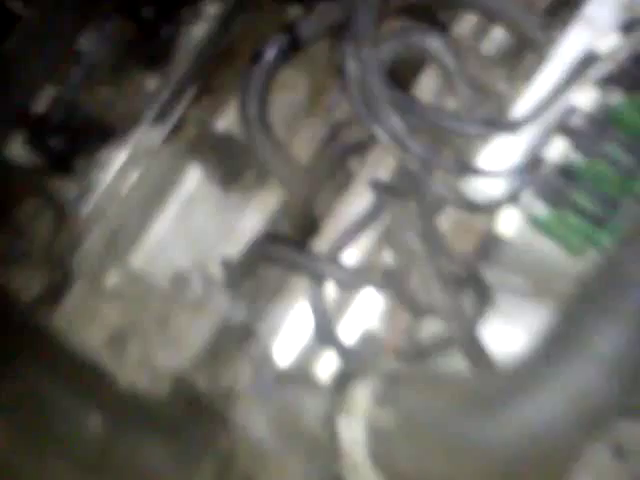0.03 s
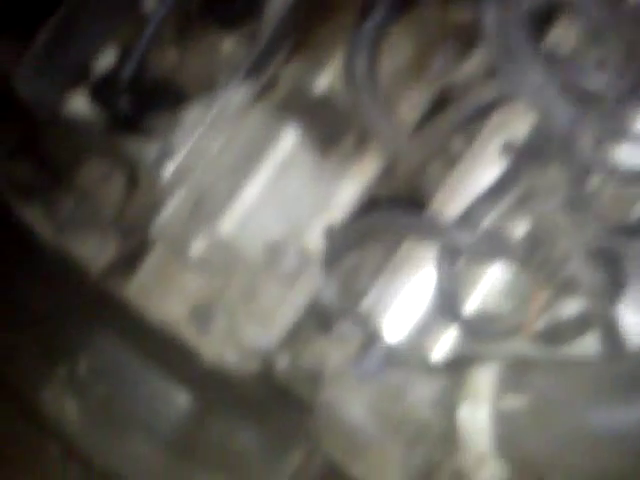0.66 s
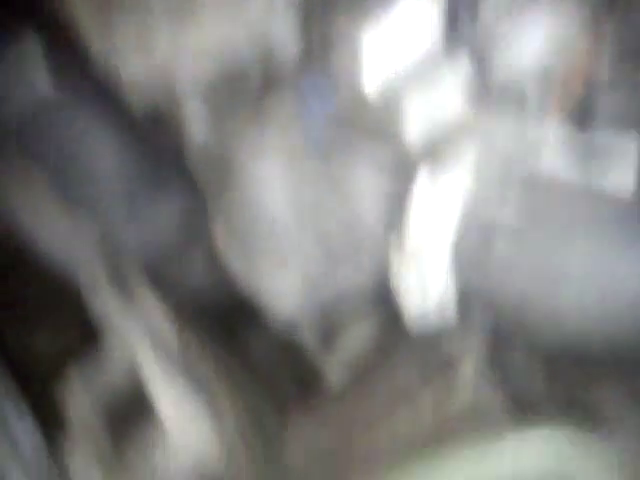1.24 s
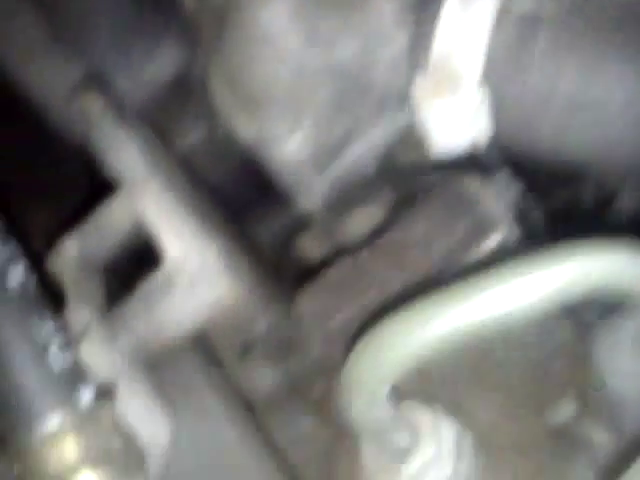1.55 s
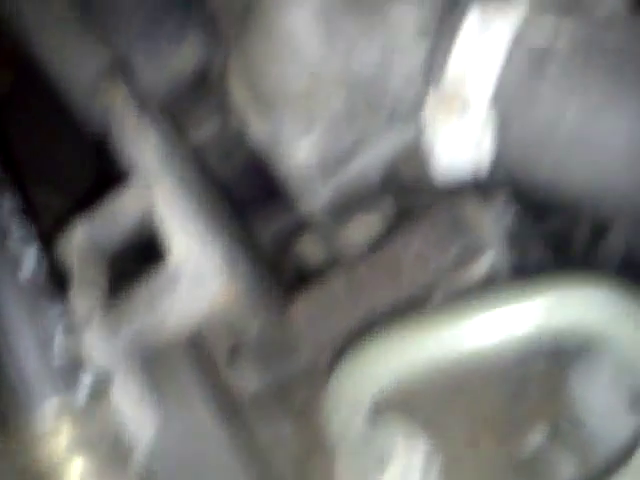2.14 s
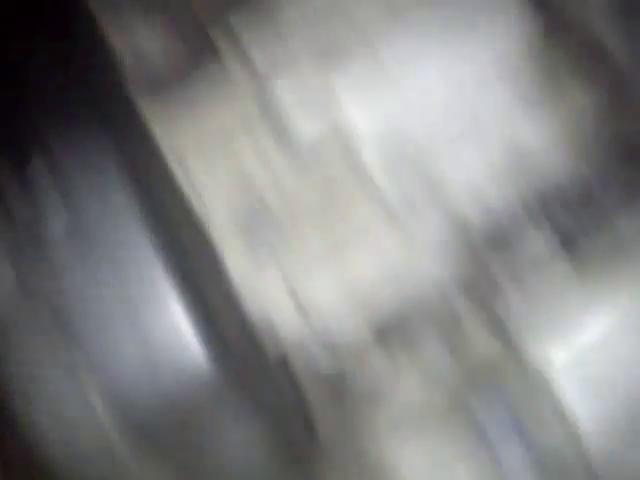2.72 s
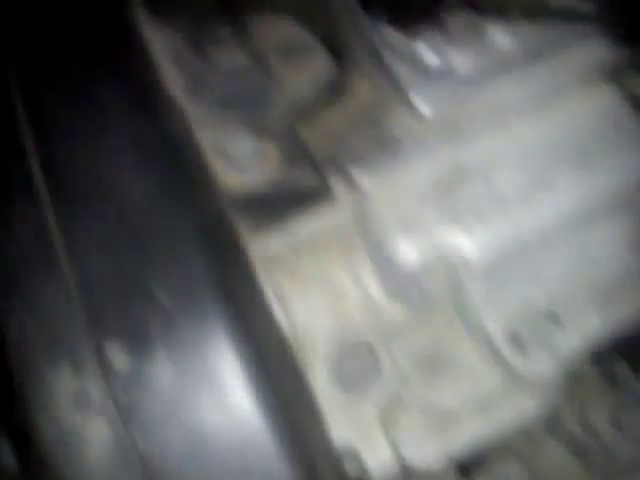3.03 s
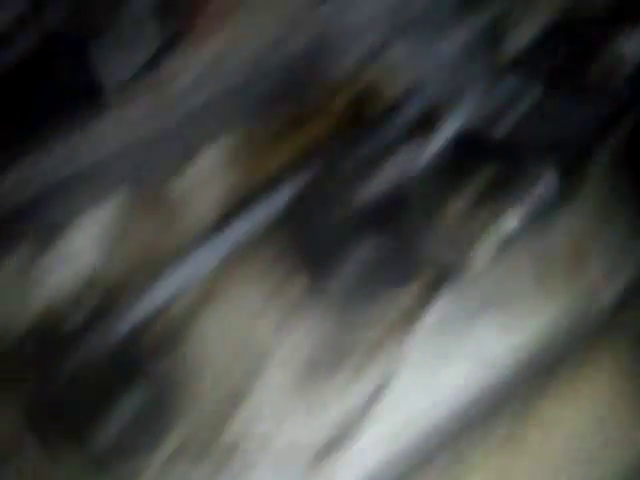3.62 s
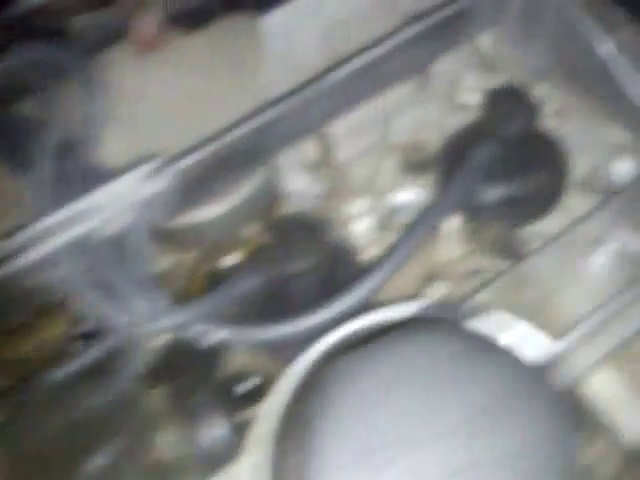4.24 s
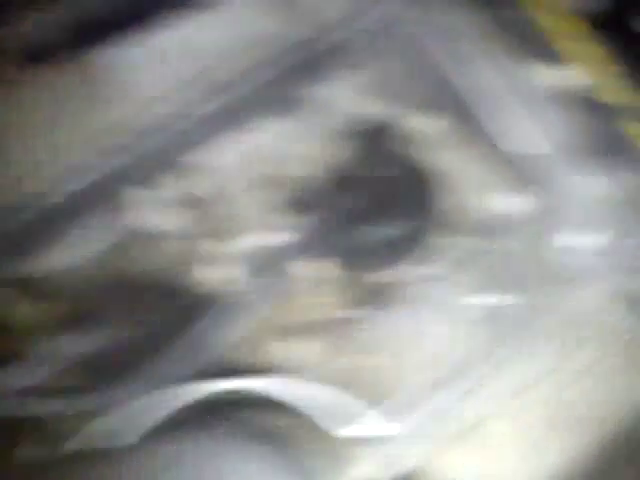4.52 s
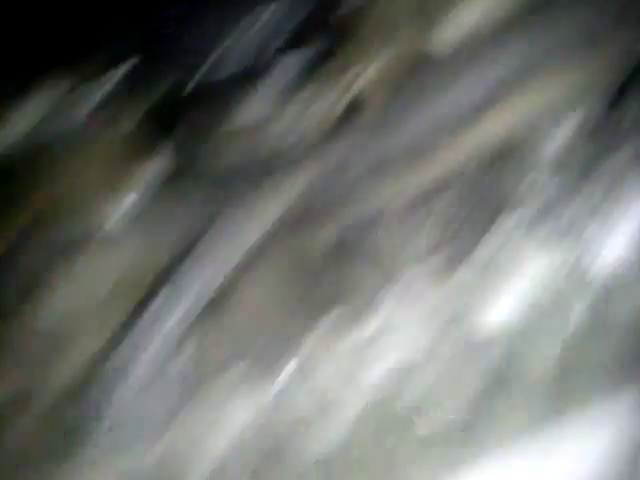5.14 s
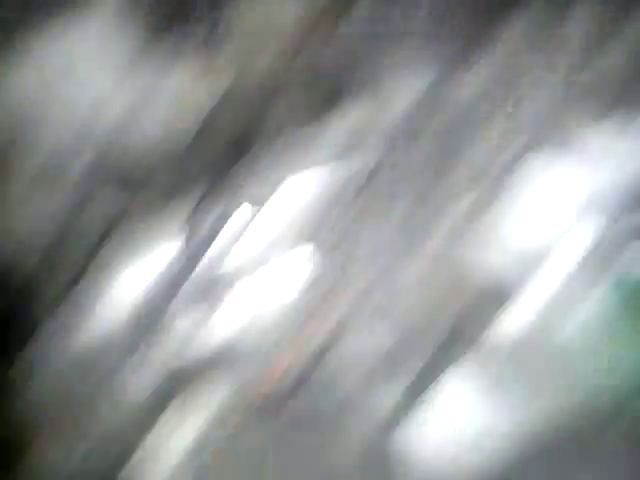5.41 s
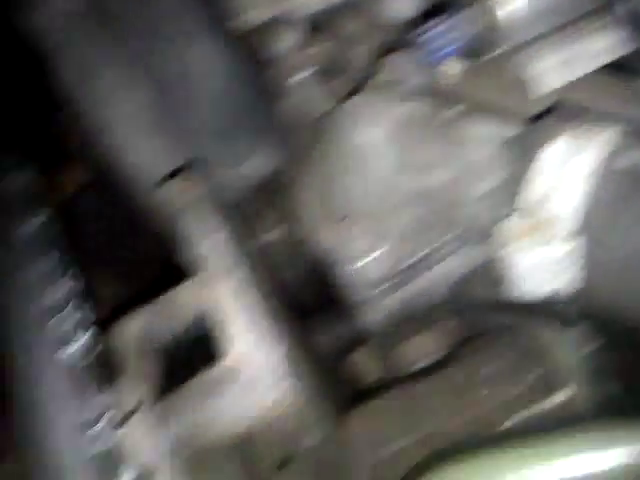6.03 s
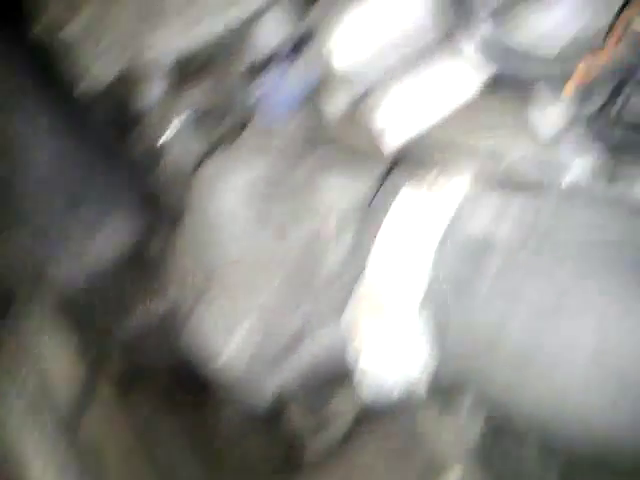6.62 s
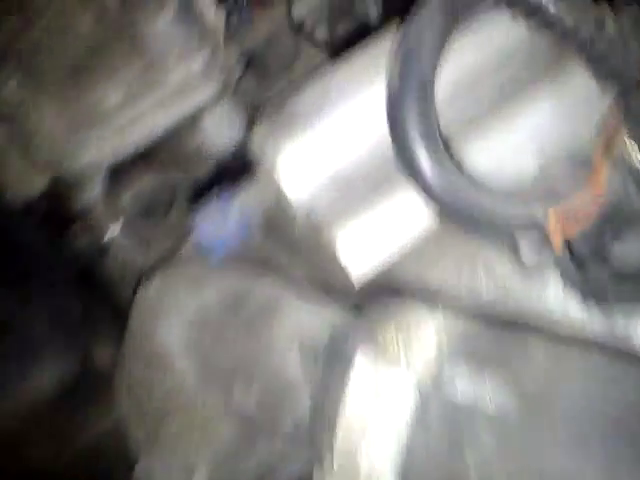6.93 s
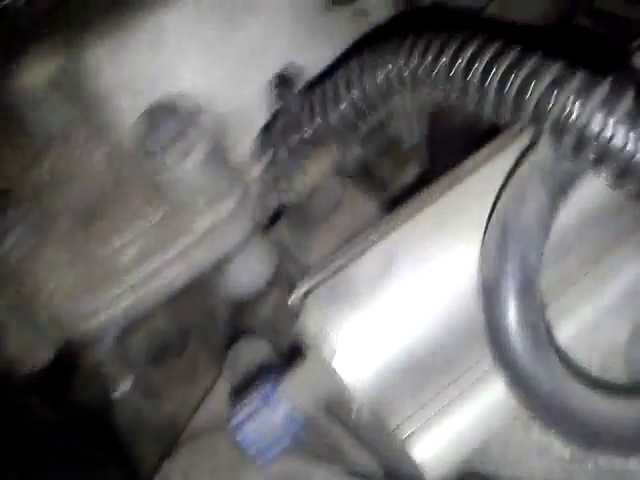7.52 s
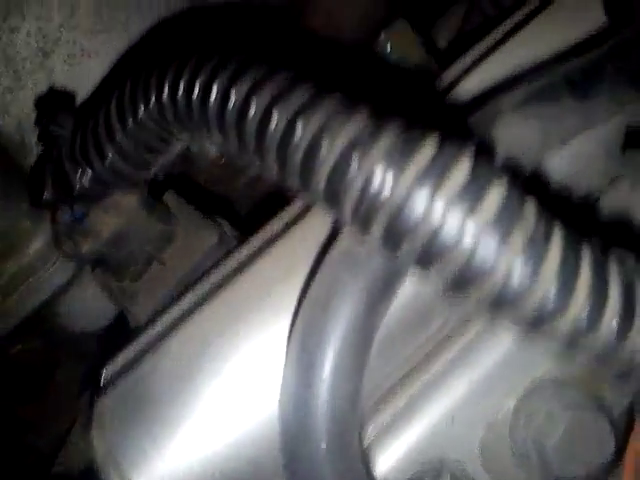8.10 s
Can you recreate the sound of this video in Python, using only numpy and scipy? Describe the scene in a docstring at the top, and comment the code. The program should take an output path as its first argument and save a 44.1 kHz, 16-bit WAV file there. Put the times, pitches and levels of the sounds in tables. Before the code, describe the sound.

Heard from inside the engine bay, an idling car engine clatters with fast metallic ticks and knocks above a low throb and whirr.

```python
"""After 0.8 s of silence a clattering four-cylinder petrol idle cuts in, about 775 rpm, close under the hood.
The belt drive's whirr and a low throb form the bed. On top, every engine cycle repeats the same hits: two
loose lifters clack, firings thud, the intake puffs, the timing gear shimmers, valves tick, one cylinder
knocks and pistons slap. The microphone passes over the valve cover midway, bringing up its hard ring;
just after 4 s one lifter takes up its slack and quietens."""
import sys
import numpy as np
from scipy import signal
from scipy.fft import rfft, irfft
from scipy.io import wavfile

SR = 44100
rng = np.random.default_rng(int(sys.argv[2]) if len(sys.argv) > 2 else 0)


def dump_mix(stems):
    """Bounce the given channels to the path in sys.argv[1] as a 16-bit WAV at rate SR."""
    frames = np.atleast_2d(stems).T  # one column per channel
    limited = np.clip(frames, -1, 1)  # hard clip at full scale
    pcm = np.round(limited * 32767).astype(np.int16)
    wavfile.write(sys.argv[1], SR, pcm)


N = 364266

# wandering idle: t/s, speed/rpm
IDLE_SPEED = [(0.78, 770.2), (1.05, 764.4), (1.92, 782.9), (2.4, 767.4), (2.65, 779.0), (3.18, 767.9),
              (4.68, 771.7), (4.83, 782.2), (5.2, 769.1), (5.57, 779.0), (6.37, 774.7), (8.26, 783.6)]
# how near the moving microphone is to the cylinder head: t/s, level/dB
NEARNESS = [(.9, -2.5), (1.8, -2.5), (3, 1), (3.8, 2.5), (4.9, -0.5), (5.5, 1), (5.9, -3), (6.8, -1.5),
            (7.6, 1.5), (8.2, 1.5)]
# EQ of the belt and fan noise: f/Hz, relative level/dB
WHIRR_EQ = [(40, -12), (70, -3), (110, 1.5), (230, -3.5), (450, 4), (700, -1), (1400, -1), (2300, -2),
            (3100, -5.5), (4000, -7), (5300, -12.5), (7000, -16), (10000, -19), (16000, -28)]
# fader ride of the alternator whine: t/s, level/dB
WHINE_RIDE = [(1, -46.5), (3.1, -44), (3.7, -39.5), (4.4, -41.5), (5.65, -55), (5.8, -38), (6.8, -40.5),
              (8.2, -42.5)]
# partials of the throb: f/cycle rate, relative level/dB
THROB_ORDERS = [(4, -9), (8, -19.5), (15, -10), (16, -2), (18, -8.5), (19, -10), (20, -16), (24, -17),
                (28, -15), (30, -18.5), (44, -15.5)]
# hit patterns: position/cycle, relative level/dB, t60 of the crack/s
FIRST_LIFTER_HITS = [(.107, 0, 0.026), (.133, 14, 0.017)]
SECOND_LIFTER_HITS = [(.825, 0.5, 0.017), (.842, -1.5, 0.032), (.886, -2.5, 0.009), (.936, -9.5, 0.023)]
KNOCK_HITS = [(.546, 0.5, 0.024), (.566, -2.5, 0.039), (.611, 2.5, 0.01), (.638, 0, .009), (.66, -8, 0.029)]
VALVE_HITS = [(0.356, 13, 0.028), (0.386, 8.5, 0.016), (0.606, 12, 0.018), (0.639, 12, 0.012),
              (.107, 10, 0.012), (.238, 2, 0.021)]
FIRING_HITS = [(.035, -1, .12), (.285, -1.5, 0.14), (.535, -1.1, 0.077), (.785, 0.39, 0.076)]
# tone of each struck part: f/Hz, relative level/dB
FIRST_LIFTER_EQ = [(780, -21), (1350, 0.5), (2000, -7), (2320, 3), (2550, -6), (2800, -1.5), (3600, 4.5),
                   (4400, -2), (5100, 2.5), (6600, -1), (8000, -6), (9200, -3.5), (11500, -12), (13000, -6),
                   (14400, -14), (16000, -14)]
SECOND_LIFTER_EQ = [(780, -6.5), (1300, -1), (2000, -5), (2800, -4.0), (3800, 1.8), (4600, -6.5),
                    (5300, -2), (6700, -4.5), (8000, -10), (9500, -7.5), (11500, -15.5), (13000, -10),
                    (14200, -16.4), (16000, -15.5)]
KNOCK_EQ = [(390, -14), (650, -23), (850, -10.5), (1050, 3), (1250, -6.5), (1550, 1.5), (2050, 2),
            (2600, 1.5), (3200, -1), (4200, -1.5), (5000, -14), (7000, -20), (12000, -43)]
VALVE_EQ = [(780, -9), (1300, -11), (2200, -4), (3500, 1), (5200, -6.5), (6700, -7), (8200, -4),
            (9300, -3.5), (11500, -8), (15500, -21)]
BLOCK_EQ = [(390, -25.5), (650, -9), (800, -2), (1000, -0.8), (1400, -4), (1700, -1.8), (2200, -9),
            (3000, -20.5), (5000, -23), (12000, -28)]
# ride of the valve cover's ring as the microphone passes over it: t/s, level/dB
COVER_RIDE = [(1, 3.5), (2.4, 0.5), (3.2, 5), (3.8, 8.5), (4.5, 10.5), (5.4, 2), (6.7, 3.5), (7.7, -1.5)]
# intake gulps, timing gear rubs and piston slaps: position/cycle, relative level/dB
INTAKE_GULPS = [(.168, 2), (.42, 4), (.668, 2), (.9, 0)]
GEAR_RUBS = [(.235, 5), (.745, 4)]
PISTON_SLAPS = [(.548, 2), (0.846, -2.5)]
# hollow ring of the cylinder wall: f/Hz, width/Hz, relative level/dB
WALL_MODES = [(1509, 39, -1.5), (1794, 120, -1.5), (2102, 46, 3), (2270, 79, -22)]
# resonances of head, covers and brackets: f/Hz, width/Hz, relative level/dB
BODY_MODES = [(862, 15.4, -3.5), (1090, 51, -7.5), (1178, 45, -12.5), (1340, 30, -3), (1496, 18, -2.5),
              (1713, 55, -8.5), (2070, 36, -7), (2627, 36, -3), (3870, 43, -12.5), (5180, 370, -6),
              (6180, 88, -7.5), (6730, 230, -4.5)]

CUT_IN_S, CUT_IN_CYCLE = .781, -.087
BAY_T60_S = .075


def from_db(db):
    """Decibels to gain."""
    return 10 ** (np.asarray(db) / 20)


def rms_one(x):
    """Scale to an rms of 1."""
    return x / np.sqrt(np.mean(x ** 2) + 1e-20)


def automation(points):
    """A breakpoint curve, read at every sample."""
    times, values = np.transpose(points)
    return np.interp(np.arange(N) / SR, times, values)


def drift(rate_hz, hop=40, settle=2000):
    """Slow random wobble with a spread of 1."""
    r = np.exp(-2 * np.pi * rate_hz * hop / SR)
    noise = rng.standard_normal(N // hop + settle + 2)
    slow = signal.lfilter([1], [1, -2 * r, r * r], noise)[settle:]
    return np.interp(np.arange(N) / hop, np.arange(len(slow)), rms_one(slow))


def resonate(x, hz, width_hz):
    """A two-pole resonance with unity gain at its peak."""
    r = np.exp(-np.pi * width_hz / SR)
    feedback = [1, -2 * r * np.cos(2 * np.pi * hz / SR), r * r]
    return signal.lfilter(np.array([1, 0, -1]) * (1 - r * r) / 2, feedback, x + 1e-18)


def colour(x, eq, size=2048):
    """Minimum-phase EQ, so hits have no pre-ring; the result has an rms of 1."""
    hz, db = np.transpose(eq)
    grid_hz = np.maximum(np.arange(size // 2 + 1) * SR / size, 1)
    gain = from_db(np.interp(np.log(grid_hz), np.log(hz), db))
    cepstrum = irfft(np.log(gain))
    cepstrum[1:size // 2] *= 2
    cepstrum[size // 2 + 1:] = 0
    impulse = irfft(np.exp(rfft(cepstrum)))
    return rms_one(signal.oaconvolve(x, impulse)[:N])


def strikes(cycles, position, spread_db, jitter_s):
    """One click a cycle at the given position, a little loose in level and timing."""
    due = np.arange(np.floor(cycles[0]), cycles[-1] - position) + position
    accent, lag = rng.standard_normal((64, 2))[:len(due)].T
    at = np.interp(due, cycles, np.arange(N)) + jitter_s * SR * lag
    clicks = np.zeros(N)
    clicks[np.clip(np.round(at).astype(int), 0, N - 1)] = from_db(spread_db * accent)
    return clicks


def pattern(cycles, hits, spread_db, jitter_s):
    """Trigger clicks for several hits a cycle, each at its own level."""
    return sum(from_db(db) * strikes(cycles, position, spread_db, jitter_s) for position, db in hits)


def play(clicks, shape):
    """Every click triggers a copy of the shape, scaled by its strength."""
    out = np.zeros(N + len(shape))
    for at in np.flatnonzero(clicks):
        out[at:at + len(shape)] += clicks[at] * shape
    return out[:N]


def belt_drive(cycles, near_db):
    """Belt and fan whirr through the metalwork, with a ringing pulley and an unsteady alternator whine."""
    whirr = colour(rng.standard_normal(N), WHIRR_EQ) * from_db(1.28 * drift(61))
    pulley = from_db(-16.5) * rms_one(resonate(rng.standard_normal(N), hz=2630, width_hz=45))
    whine_phase = 2 * np.pi * 178.7 * cycles  # about 1150 Hz
    whine = np.cos(whine_phase + drift(10)) * from_db(2.1 * drift(32))
    belt = from_db(-34 + 0.21 * near_db) * body(whirr + pulley)
    return belt + from_db(automation(WHINE_RIDE)) * whine


def throb(cycles):
    """Wavering low engine orders swell together where the strongest cylinder fires."""
    phase = 2 * np.pi * (cycles - .76)
    partials = sum(from_db(db + 2.15 * drift(4.5)) * np.cos(order * phase + 0.58 * drift(2.15))
                   for order, db in THROB_ORDERS)
    return from_db(-39.7) * np.sqrt(2) * partials


def impacts(cycles, hits, eq, rise_s, snap, tail_db, tail_hz, repeat, spread_db, jitter_s):
    """Struck metal in three layers: a sharp snap, a crack of dense modes, a duller engine bay tail."""
    t = np.arange(6000) / SR
    frozen, crack_power, blows = np.zeros((3, N))
    for position, db, t60 in hits:
        clicks = from_db(db) * strikes(cycles, position, spread_db, jitter_s)
        envelope = (1 - np.exp(-t / rise_s)) * from_db(-60 * t / t60)
        frozen += play(clicks, envelope * rng.standard_normal(len(t)))
        crack_power += play(clicks ** 2, envelope ** 2)
        blows += clicks
    # repeat is the share of the crack's power that sounds the same every cycle
    fresh = np.sqrt((1 - repeat) * crack_power) * rng.standard_normal(N)
    crack = np.sqrt(repeat) * frozen + fresh
    tail_envelope = (1 - np.exp(-t / 0.0052)) * from_db(tail_db - 60 * t / BAY_T60_S)
    tail = np.sqrt(play(blows ** 2, tail_envelope ** 2)) * rng.standard_normal(N)
    tail = signal.sosfilt(signal.butter(2, tail_hz, fs=SR, output="sos"), tail)
    return colour(snap * blows + crack + tail, eq)


def lifters(cycles, near_db):
    """Two loose lifters clack; the first takes up its slack and drops 8 dB."""
    taken_up = np.clip((np.arange(N) / SR - 4.08) / 0.155, 0, 1)
    first = impacts(cycles, FIRST_LIFTER_HITS, FIRST_LIFTER_EQ, rise_s=0.0011, snap=3.1,
                    tail_db=-7, tail_hz=5840, repeat=0.73, spread_db=0.6, jitter_s=0.00046)
    second = impacts(cycles, SECOND_LIFTER_HITS, SECOND_LIFTER_EQ, rise_s=0.00049, snap=1.5,
                     tail_db=-5.5, tail_hz=6310, repeat=0.57, spread_db=1.1, jitter_s=0.00036)
    pair = from_db(-37.5 - 8 * taken_up) * first + from_db(-36.5) * second
    return from_db(0.75 * near_db) * pair


def combustion(cycles):
    """Each firing thuds through the block, four to a cycle."""
    return from_db(-38) * impacts(cycles, FIRING_HITS, BLOCK_EQ, rise_s=0.0016, snap=0.5,
                                  tail_db=-36, tail_hz=1490, repeat=0.51, spread_db=1.5, jitter_s=.001)


def valves(cycles, near_db):
    """Valves tick: light, bright hits with a fast attack."""
    ticks = impacts(cycles, VALVE_HITS, VALVE_EQ, rise_s=0.0001, snap=2.9,
                    tail_db=-11, tail_hz=9000, repeat=0.56, spread_db=2, jitter_s=.0002)
    return from_db(-44.5 + 1.54 * near_db) * ticks


def intake(cycles, near_db, hoot_hz=486, swell_s=.0059):
    """Each gulp of air swells and fades as a short, slightly turbulent hoot in the intake duct."""
    gulps = pattern(cycles, INTAKE_GULPS, spread_db=1.03, jitter_s=0.00038)
    t = np.arange(-1200, 1200) / SR
    swell = np.exp(-.5 * (t / swell_s) ** 2)
    hoot = signal.oaconvolve(gulps, swell * np.cos(2 * np.pi * hoot_hz * t), "same")
    turbulence = resonate(rng.standard_normal(N), hoot_hz, width_hz=47)
    swirl = signal.oaconvolve(gulps, swell, "same") * turbulence
    return from_db(-40 + 0.63 * near_db) * rms_one(rms_one(hoot) + .4 * rms_one(swirl))


def timing_gear(cycles):
    """Once a crank turn a brief rub makes the timing gear shimmer."""
    rubs = pattern(cycles, GEAR_RUBS, spread_db=0.5, jitter_s=0.0012)
    friction = play(rubs, np.hanning(450)) * rng.standard_normal(N)
    return from_db(-56) * rms_one(resonate(friction, hz=5280, width_hz=50))


def knock(cycles, near_db):
    """One cylinder knocks: a tight cluster of hard midrange blows."""
    blows = impacts(cycles, KNOCK_HITS, KNOCK_EQ, rise_s=0.00021, snap=3.4,
                    tail_db=-9.5, tail_hz=3000, repeat=0.69, spread_db=1.2, jitter_s=.0004)
    return from_db(-40.5 + 1.35 * near_db) * blows


def piston_slap(cycles, near_db):
    """Short, rough piston slaps ring the cylinder wall; the harder one lands with the knock."""
    t = np.arange(2000) / SR
    slaps = pattern(cycles, PISTON_SLAPS, spread_db=0.7, jitter_s=0.00035)
    bursts = play(slaps, t * np.exp(-t / 0.0027)) * rng.standard_normal(N)
    wall = sum(from_db(db) * resonate(bursts, hz, width) for hz, width, db in WALL_MODES)
    return from_db(-44 + 0.6 * near_db) * rms_one(wall)


def valve_cover(shake):
    """The shaken cover panel adds a hard ring, strongest with the microphone right above it."""
    return (from_db(automation(COVER_RIDE)) - 1) * resonate(shake, hz=3730, width_hz=1650)


def body(x):
    """Head, covers and brackets ring along with whatever drives them."""
    return 0.76 * (x + sum(from_db(db) * resonate(x, hz, width) for hz, width, db in BODY_MODES))


def engine_bay(x):
    """Resonances of the bay rise and sink as the microphone moves."""
    t = np.arange(N) / SR
    # at the far end of the cover the bay loses its low hollow and honks
    far_end = np.exp(-.5 * ((t - 4.65) / 0.36) ** 2)
    honk_db = 4.5 * far_end
    # towards the end, down by the hoses, the hollow and a metallic ring grow
    hollow_db = 1.03 * np.maximum(t - 3.9, 0) - 11.5 * far_end
    ring_db = 3.5 * np.maximum(t - 6.73, 0)
    hollow = (from_db(hollow_db) - 1) * resonate(x, hz=188, width_hz=83)
    honk = (from_db(honk_db) - 1) * resonate(x, hz=1010, width_hz=190)
    ring = (from_db(ring_db) - 1) * resonate(x, hz=5140, width_hz=300)
    return x + hollow + honk + ring


def scene():
    """The mono mix, with every rhythm locked to the engine cycle of two crank turns."""
    cycles = np.cumsum(automation(IDLE_SPEED)) / (2 * 60 * SR)
    cycles = cycles - cycles[round(CUT_IN_S * SR)] + CUT_IN_CYCLE
    near_db = automation(NEARNESS)
    puffs = intake(cycles, near_db)
    clacks = lifters(cycles, near_db)
    knocks = knock(cycles, near_db)
    ticks = valves(cycles, near_db)
    cover = valve_cover(knocks + 0.37 * clacks + 0.36 * ticks)
    metal = body(clacks + knocks + ticks + cover + combustion(cycles))
    metal += piston_slap(cycles, near_db) + timing_gear(cycles)
    bed = throb(cycles) + belt_drive(cycles, near_db)
    return engine_bay(metal + puffs + bed)[None]


def record(dry):
    """A hard cut in from silence, then a steep low-pass that shaves off the very top."""
    gate = np.clip((np.arange(N) / SR - CUT_IN_S) / 0.0028, 0, 1)
    return signal.sosfilt(signal.ellip(10, .2, 70, 17100, fs=SR, output="sos"), dry * gate)


dry = scene()
out = record(dry)
dump_mix(out)
```